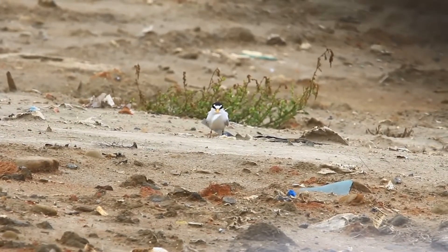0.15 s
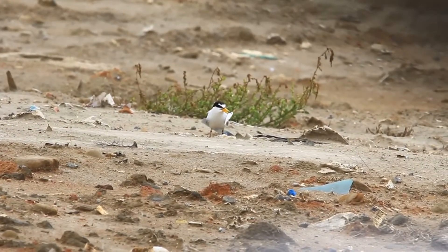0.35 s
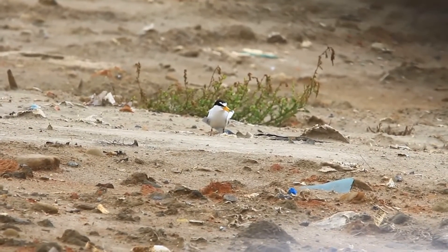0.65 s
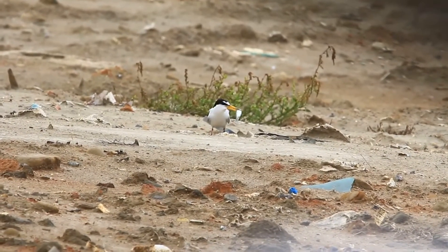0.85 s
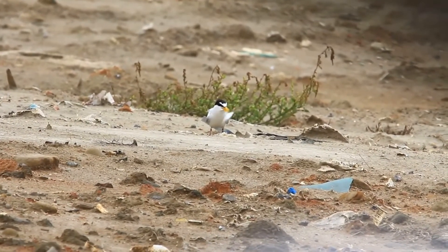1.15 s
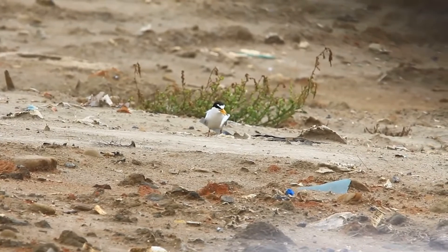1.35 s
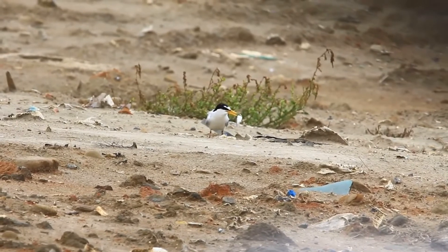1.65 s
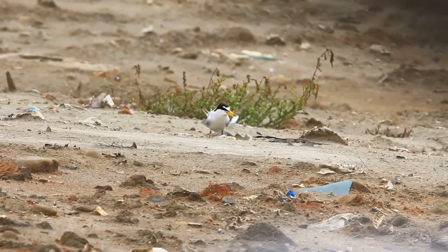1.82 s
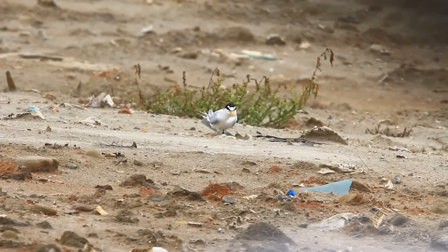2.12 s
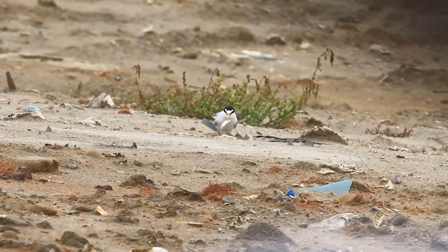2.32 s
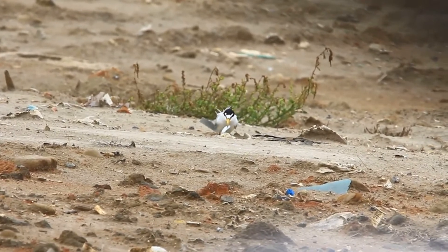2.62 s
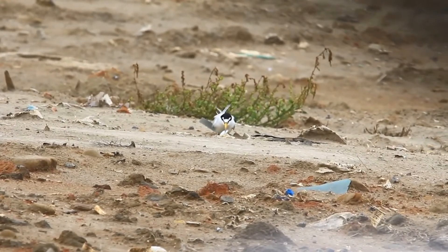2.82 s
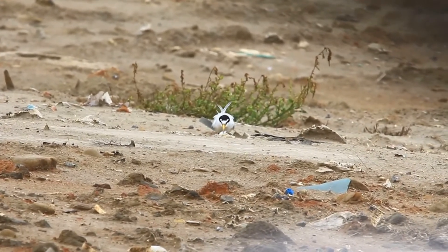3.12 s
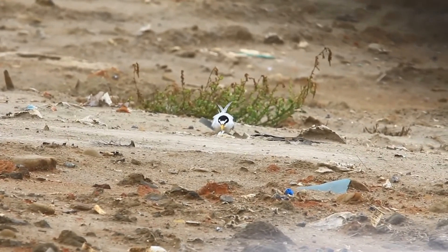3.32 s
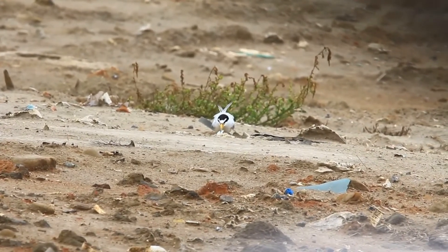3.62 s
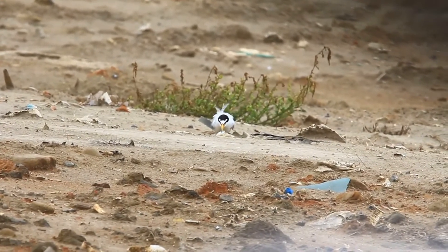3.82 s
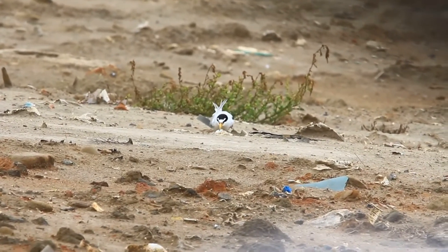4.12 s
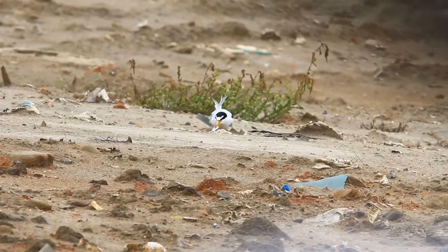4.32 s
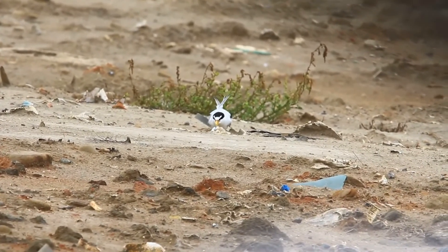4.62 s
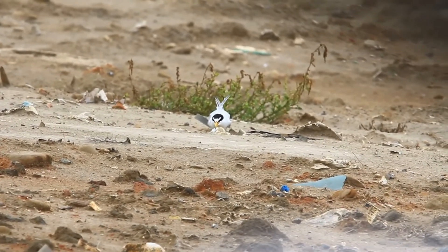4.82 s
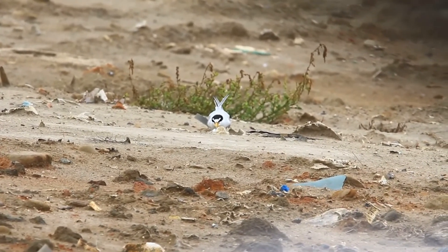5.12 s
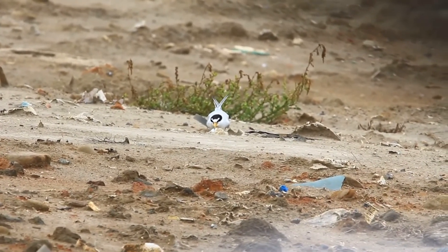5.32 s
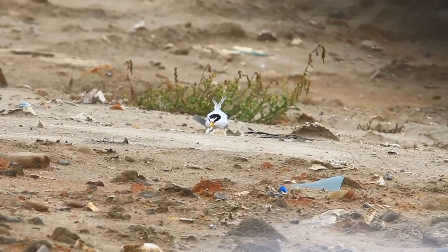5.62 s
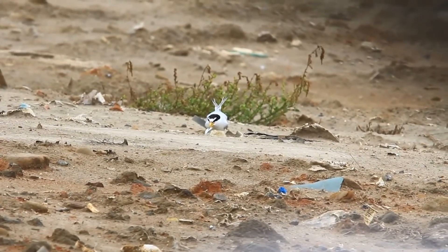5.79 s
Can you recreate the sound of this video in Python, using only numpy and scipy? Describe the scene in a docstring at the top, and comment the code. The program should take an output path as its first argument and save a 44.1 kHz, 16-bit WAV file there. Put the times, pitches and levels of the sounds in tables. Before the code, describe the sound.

Terns give short harsh rasping cries and clear creaky whistles over soft surf hiss; the shore fades to silence, then returns quieter with sparse calls.

```python
"""Surf hiss and a little lumpy wind lie over an open shore; terns call and farther birds peep.
One tern gives harsh calls, pulses that break into a two-voiced rasp; another gives clear ones, a creak
that locks into a whistle. The peeps are wavering near-sines; surf and wind are stereo noise in bands.
The first view of the shore fades to silence, then a quieter one fades in under spaced clear calls.
All the birds carry a weak sideways bounce and one faint far echo."""
import sys
import numpy as np
from scipy import signal
from scipy.fft import rfft, irfft
from scipy.io import wavfile
from scipy.ndimage import uniform_filter1d

SR = 44100
rng = np.random.default_rng(int(sys.argv[2]) if len(sys.argv) > 2 else 0)


def pcm_store(signal):
    """Save signal as 16-bit PCM."""
    levels = np.round(np.clip(np.atleast_2d(signal), -1, 1) * 32767)
    wavfile.write(sys.argv[1], SR, levels.astype(np.int16).T)


N = 262395
JUMP_S = .002   # time a tern's voice takes to jump to its next state
DULL_OVERTONE = 8.5   # overtones fade above this order, so slow pulses are dull


def from_db(db):
    """Gain of a level."""
    return 10 ** (np.asarray(db) / 20)


def rms_one(x):
    """Signal scaled to rms 1."""
    return x / np.sqrt(np.mean(x ** 2) + 1e-20)


def at_hz(points, hz):
    """A table read on a log-frequency axis."""
    table_hz, values = np.array(points).T
    return np.interp(np.log(hz), np.log(table_hz), values)


def sampled(rows):
    """Sample numbers spanned by a short table, and its columns sample by sample."""
    s, *columns = np.transpose(rows)
    at = np.arange(round(s[0] * SR), min(round(s[-1] * SR), N))
    return at, [np.interp(at / SR, s, c) for c in columns]


def drift(rate_hz, size=N):
    """Slow random wander: noise through a double one-pole low-pass, spread 1."""
    r = np.exp(-2 * np.pi * rate_hz / SR)
    run_in = SR // 2
    noise = rng.standard_normal(size + run_in)
    return rms_one(signal.lfilter([1], [1, -2 * r, r * r], noise)[run_in:])


def banded_noise(spectrum, likeness, patchy_db, rate_hz):
    """Narrow bands of stereo noise, each with its own level, flicker and left-right likeness; rms 1."""
    out, together = 0, drift(rate_hz)
    edges = np.geomspace(spectrum[0][0], 1.1 * spectrum[-1][0], 22)
    white = rng.standard_normal((2, 2, N))
    for k, (low, high) in enumerate(zip(edges, edges[1:])):
        band = signal.butter(3, [low, high], "band", fs=SR, output="sos")
        mid, side = signal.sosfilt(band, white[k % 2])   # neighbouring bands use different noise
        hz = np.sqrt(low * high)
        alike = np.clip(at_hz(likeness, hz), 0, .995)
        flicker_db = patchy_db * (together + .6 * drift(rate_hz))
        gain = from_db(at_hz(spectrum, hz) + flicker_db)
        out = out + gain * (np.sqrt(1 + alike) * mid + np.sqrt(1 - alike) * side * [[1], [-1]])
    return rms_one(out)


def shore(gain, sink_db_per_s, surf_spectrum, likeness, wind_db, tones):
    """Surf hiss, lumpy wind at the microphone and thin steady-pitched tones, faded together."""
    # low rumble of wind on the microphone: (frequency [Hz], relative level [dB])
    wind_spectrum = [(20, 9.5), (40, -11.5), (130, -21.5), (300, -26.5), (600, -33)]
    # puffs of wind: (time of the peak [s], lift at the peak [dB])
    gusts = [(0.301, 6.4), (0.47, 11.6), (2.3, 4.2), (4.55, 9.1), (5.25, 11.3)]
    gust_s = .025   # from the peak until the lift is down to 1/e
    t = np.arange(N) / SR
    puffs_db = sum(db * np.exp(-((t - s) / gust_s) ** 2) for s, db in gusts)
    wind = banded_noise(wind_spectrum, likeness, patchy_db=2.5, rate_hz=14)
    wind = from_db(wind_db + puffs_db) * wind
    hum = sum(from_db(db + 2.9 * drift(7.3)) * np.sin(2 * np.pi * hz * t) for hz, db in tones)
    surf = banded_noise(surf_spectrum, likeness, patchy_db=1.66, rate_hz=4)
    return gain * (from_db(-sink_db_per_s * t) * (surf + hum) + wind)


def first_shore():
    """The louder view: its surf sinks slowly, then everything fades to silence."""
    # surf over distance: (frequency [Hz], relative level [dB])
    surf_spectrum = [(300, -30), (780, -33), (1000, -16), (1300, -1), (3100, 0), (4310, -5), (6360, -19),
                     (9390, -27.5), (11700, -23), (15000, -30)]
    # how alike left and right are: (frequency [Hz], likeness [0-1])
    likeness = [(25, .97), (60, 0.9), (125, .83), (290, .78), (600, .9), (1400, .99), (15000, .88)]
    # thin tones: (frequency [Hz], mean peak level against the rms of the surf [dB])
    tones = [(3203, -12)]
    level_db, sink_db_per_s, wind_db = -40, 1.55, -25   # wind is set against the view's level
    from_s, end_s, power = 2.82, 4.165, 1.54   # fade-out
    fade_out = np.clip((end_s - np.arange(N) / SR) / (end_s - from_s), 0, 1) ** power
    return shore(from_db(level_db) * fade_out, sink_db_per_s, surf_spectrum, likeness, wind_db, tones)


def second_shore():
    """The quieter view fades in, with more wind for its surf."""
    # surf over distance: (frequency [Hz], relative level [dB])
    surf_spectrum = [(180, -52.5), (300, -16.5), (781, -14), (892, -12), (1730, 1.5), (1940, -6),
                     (3230, -3), (5480, -17), (15500, -19.5)]
    # how alike left and right are: (frequency [Hz], likeness [0-1])
    likeness = [(25, 0.5), (60, 1), (290, 0.55), (2000, 1), (7000, 0.18)]
    # thin tones: (frequency [Hz], mean peak level against the rms of the surf [dB])
    tones = [(3203, -14), (810, -23)]
    level_db, wind_db = -63.5, -4.5   # wind is set against the view's level
    from_s, end_s, power = 4.214, 4.92, 1.14   # fade-in
    fade_in = np.clip((np.arange(N) / SR - from_s) / (end_s - from_s), 0, 1) ** power
    return shore(from_db(level_db) * fade_in, 0, surf_spectrum, likeness, wind_db, tones)


def minimum_phase(points, size=1024):
    """Minimum-phase impulse response of a spectrum: pulses start sharply and ring out."""
    hz = np.maximum(np.fft.rfftfreq(size, 1 / SR), 1)
    cepstrum = irfft(np.log(from_db(at_hz(points, hz))))
    cepstrum[1:size // 2] *= 2
    cepstrum[size // 2 + 1:] = 0
    return irfft(np.exp(rfft(cepstrum)))


def call(hz, level_db, beat_hz, depth_db, second_db, throat, jitter, breath_db, spray_db, stutter_db, dull):
    """Membrane pulses; a second voice tugs at their timing, and the harder it tugs the more both stumble."""
    size, depth = len(hz), from_db(depth_db)
    rough = np.minimum(3 * depth ** 2, 1)

    stumble = jitter * rough * drift(430, size=size)
    phase = 2 * np.pi * np.cumsum(hz * (1 + stumble)) / SR
    beat_stumble = 5 * jitter * (rough + .25) * drift(200, size=size)
    beat_phase = 2 * np.pi * np.cumsum(beat_hz * (1 + beat_stumble)) / SR
    # the tug gives sum and difference tones
    tug = depth * from_db(2.7 * rough * drift(110, size=size)) * np.sin(beat_phase)

    source = 0
    for k in range(1, 16):
        in_range = np.clip(k * hz / 200 - 4, 0, 1) * (k * hz < 8000)   # fades up from 800 to 1000 Hz
        source = source + np.cos(k * phase - tug) * in_range * np.exp(-(k / dull) ** 2)
    second_gain = from_db(second_db + 7 * rough * drift(110, size=size))
    source += second_gain * np.cos(2 * phase - beat_phase)
    source += from_db(breath_db) * (rough + .03) * rng.standard_normal(size)

    voice = signal.fftconvolve(source, throat)[:size]
    # even out the power, so that level_db alone sets the loudness
    power = uniform_filter1d(uniform_filter1d(voice ** 2, size=160), size=160)
    voice /= np.sqrt(power + 1e-12)
    # faint wide hiss
    voice += rough * from_db(spray_db + 2.5 * drift(60, size=size)) * rng.standard_normal(size)
    # the airflow catches
    catches = uniform_filter1d(np.minimum(drift(320, size=size), .5), size=24)
    voice *= from_db(stutter_db * rough * catches)
    return voice * from_db(level_db) * signal.windows.tukey(size, .04)


def harsh_tern():
    """A glide upward, grainy at first and at times with every other pulse weaker, breaks into a rasp."""
    # harsh calls: (start [s], voice steadies [s], breaks [s], ends [s], steady pitch [Hz],
    # pitch at the break [Hz], level at the break [dB], rasp pitch [Hz], rasp level [dB],
    # second voice [Hz], wide hiss against the voice [dB], opening [0 quick, 1 slow])
    harsh_calls = [ (0.176, 0.195, 0.229, 0.272, 1380, 1670, -14, 2170, -12.5, 3540, -46, 0),
                   (0.570, 0.591, 0.621, 0.672, 1370, 1660, -15, 2180, -13.5, 3520, -43, 0),
                   (0.818, 0.858, 0.883, 0.931, 1350, 1530, -17, 2160, -13.5, 3420, -44, 1),
                   (1.017, 1.036, 1.060, 1.119, 1390, 1610, -15, 2110, -13, 3360, -46, 0),
                   (1.439, 1.478, 1.510, 1.554, 1330, 1580, -16, 2150, -14.5, 3400, -39, 1),
                   (2.155, 2.178, 2.218, 2.259, 1330, 1610, -17, 2160, -16.5, 3360, -48, 0),
                   (2.646, 2.693, 2.720, 2.758, 1340, 1580, -21, 2090, -18, 3400, -36, 1), ]
    # throat and distance: (frequency [Hz], relative level [dB])
    throat_spectrum = [(850, -32.5), (1500, -13), (2200, -11.5), (2900, -5), (3500, 1), (3950, 0),
                       (4400, -1), (5200, -8.5), (6100, -23), (6900, -36.5), (7700, -60)]
    # quick and slow opening up to the steady voice:
    # (share of the time [0-1], share of steady pitch [0-1], level against the break [dB])
    openings = [
        [(0, .4, -25), (.42, .66, -12), (1, 1, -5)],
        [(0, .315, -25), (.31, .47, -11), (.64, .73, -7.5), (.95, .87, -4.5), (1, 1, -3.5)],
    ]
    # line between the overtones, half a pitch off, for (quick [dB], slow [dB]) openings
    half_line_db = (-30, -16)
    # the glide slows: pitch lift at its middle for (quick [Hz], slow [Hz]) openings
    glide_bow_hz = (26.2, 0)
    # rasp: (share of its time [0-1], share of rasp pitch [ratio], level against the rasp level [dB],
    # share of second voice pitch [ratio], second voice level [dB])
    rasp_shape = [(0, .94, -2.5, .98, -6), (.2, .98, -1, .99, -9), (.4, 1, 0, 1.01, -19),
                  (.66, 1.01, 0, 1.005, -19), (.84, .93, -6, .99, -9), (1, .8, -19, .93, -2)]
    glide_bow_db, rasp_depth_db = -3, -3.5   # level at the glide's middle; tug of the second voice
    throat = minimum_phase(throat_spectrum)
    out = np.zeros(N)
    for (start, steady, breaks, end, steady_hz, top_hz, db,
         rasp_hz, rasp_db, second_hz, spray_db, slow) in harsh_calls:
        kind = int(slow > .5)
        rise = [(start + share * (steady - start), pitch * steady_hz, db + step_db)
                for share, pitch, step_db in openings[kind]]
        middle_hz = (steady_hz + top_hz) / 2 + glide_bow_hz[kind]
        rise += [((steady + breaks) / 2, middle_hz, db + glide_bow_db), (breaks, top_hz, db)]

        # rows for call: time, pitch, level, beat, tug depth, second voice level
        rows = []
        for s, hz, level_db in rise:
            depth_db = -12 if hz < 700 else -28   # grainy while low
            line_db = half_line_db[kind] if hz > 1300 else -30
            rows.append((s, hz, level_db, -hz / 2, depth_db, line_db))
        begun = breaks + JUMP_S
        for share, pitch, step_db, second_pitch, second_db in rasp_shape:
            hz = pitch * rasp_hz
            beat_hz = 2 * hz - second_pitch * second_hz   # puts the second voice at its own pitch
            rows.append((begun + share * (end - begun), hz, rasp_db + step_db,
                         beat_hz, rasp_depth_db, second_db))
        at, columns = sampled(rows)
        out[at] = call(*columns, throat, jitter=.03, breath_db=-12, spray_db=spray_db,
                       stutter_db=1.5, dull=DULL_OVERTONE)
    return out


def clear_tern():
    """A creak speeds up and locks onto the throat as a whistle, fluttering at both ends."""
    # clear calls: (start [s], locks [s], settles [s], lets go [s], ends [s], whistle pitch [Hz],
    # pitch arch [Hz], level [dB], level arch [dB], creak against the whistle [dB],
    # creak beat depth [dB], flutter depth [dB], whistle beat depth [dB])
    clear_calls = [ (0.314, 0.3625, 0.372, 0.395, 0.409, 1790, 125, -10, 4, -9, -15, -18, -24),
                   (4.404, 4.451, 4.465, 4.492, 4.507, 1772, 25, -30, 1, -8, -18, -6, -17),
                   (5.093, 5.145, 5.162, 5.187, 5.204, 1780, 20, -22, 0.5, -6, -18, -6, -14),
                   (5.943, 5.995, 6.012, 6.038, 6.054, 1780, 20, -22, 0.5, -3, -18, -6, -14), ]
    # throat and distance: (frequency [Hz], relative level [dB])
    throat_spectrum = [(900, -36), (1800, -23.5), (2650, -13.5), (3050, -2.5), (3350, -3), (3650, -2.5),
                       (4000, -3.5), (4500, -9), (5100, -21), (5500, -36), (7300, -52)]
    # creak: (share of its time [0-1], pitch [Hz], level against the creak level [dB],
    # added beat depth [dB])
    creak = [(0, 450, -12, 0), (.44, 690, -5.5, 0), (.73, 880, -5, 3), (.97, 1390, 2.5, 6)]
    # whistle: (share of its time [0-1], share of the pitch arch [0-1])
    arch = [(0, .4), (.55, 1), (.82, .8), (1, .3)]
    # letting go: (share of its time [0-1], share of whistle pitch [0-1], level step [dB], beat depth [dB])
    let_go = [(.25, .95, -4, -7), (.68, .9, -12, -4), (1, .84, -27, -4)]
    beat_share = .48   # beat rate as a share of the pitch
    throat = minimum_phase(throat_spectrum)
    out = np.zeros(N)
    for (start, lock, settle, go, end, hz, arch_hz, db, arch_db,
         creak_db, creak_beat_db, flutter_db, beat_db) in clear_calls:
        # rows: time, pitch, level, beat depth
        rows = [(start + share * (lock - start), pitch, db + creak_db + step_db, creak_beat_db + added_db)
                for share, pitch, step_db, added_db in creak]
        rows += [(lock, hz, db, flutter_db),
                 (settle - JUMP_S, hz + arch[0][1] * arch_hz, db - 1, flutter_db)]
        rows += [(settle + share * (go - settle), hz + bow * arch_hz, db + bow ** 2 * arch_db, beat_db)
                 for share, bow in arch]
        rows += [(go + share * (end - go), pitch * hz, db + step_db - arch_db / 2, depth_db)
                 for share, pitch, step_db, depth_db in let_go]
        at, (pitch, level_db, depth_db) = sampled(rows)
        out[at] = call(pitch, level_db, beat_share * pitch, depth_db, depth_db - 9, throat, jitter=.06,
                       breath_db=-6, spray_db=-58, stutter_db=5, dull=2 * DULL_OVERTONE)
    return out


def peeps():
    """Falling whistles, peeps and chips of farther birds, near sines whose level wavers."""
    # falling whistles: (start [s], end [s], level [dB])
    falls = [(0.353, 0.4, -27), (1.002, 1.062, -29)]
    # pitch of a falling whistle: (time after its start [s], pitch [Hz])
    fall_shape = [(0, 2800), (.01, 3050), (.024, 2430), (.042, 2270)]
    # far peeps: (start [s], top [s], end [s], top pitch [Hz], end pitch [Hz], level at the top [dB],
    # start level against the top [dB])
    far_peeps = [ (1.72, 1.758, 1.785, 2507, 2110, -28.5, -7),
                 (2.115, 2.149, 2.156, 2520, 2380, -37.5, -10), (2.5, 2.516, 2.535, 2520, 2360, -36.5, -28),
                 (2.9, 2.92, 2.935, 2468, 2290, -38, -26), (3.285, 3.313, 3.325, 2480, 2520, -46, -6),
                 (5.63, 5.665, 5.68, 2350, 2400, -66, -8), ]
    # short low notes: (middle [s], pitch at the middle [Hz], level at the middle [dB])
    chips = [(1.726, 1340, -38.5), (2.115, 1260, -41.5)]
    notes = []
    for start, end, db in falls:
        note = [(start + s, hz, db) for s, hz in fall_shape]
        notes.append(note + [(end, fall_shape[-1][1], db - 6.5)])
    for start, top, end, hz, end_hz, db, edge_db in far_peeps:
        notes.append([(start, .91 * hz, db + edge_db), (top, hz, db), (end, end_hz, db + 1.65 * edge_db)])
    for s, hz, db in chips:
        notes.append([(s - .007, .9 * hz, db - 10), (s, hz, db), (s + .007, hz, db - 10)])

    out = np.zeros(N)
    for rows in notes:
        at, (hz, level_db) = sampled(rows)
        size = len(at)
        wavering = from_db(level_db + 1.8 * drift(150, size=size))
        gain = np.sqrt(2) * wavering * signal.windows.tukey(size, .2)   # levels are rms
        out[at] += gain * np.sin(2 * np.pi * np.cumsum(hz) / SR)
    return out


def scene():
    """Birds in the middle with a weak sideways bounce and one far echo, over the two views of the shore."""
    bounce_s, bounce_db = .0021, -25
    echo_s, echo_db = .115, -42
    views = first_shore() + second_shore()
    near = harsh_tern() + clear_tern() + peeps()
    bounce = from_db(bounce_db) * np.roll(near, round(bounce_s * SR))
    birds = near + bounce * [[1], [-1]]   # opposite sign left and right
    lag = round(echo_s * SR)
    birds[:, lag:] += from_db(echo_db) * near[:-lag]
    return views + birds


def record(dry):
    """Loud peaks bend a little, which adds a third overtone; the top is cut."""
    cutoff_hz = 15950   # 70 dB down from here up
    bent = dry - .035 * dry ** 3
    return signal.sosfilt(signal.cheby2(14, 70, cutoff_hz, fs=SR, output="sos"), bent)


dry = scene()
out = record(dry)
pcm_store(out)
```